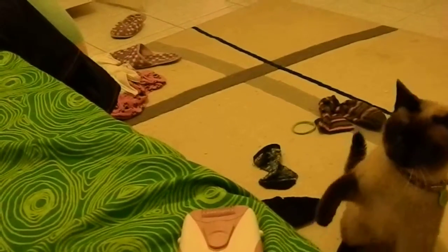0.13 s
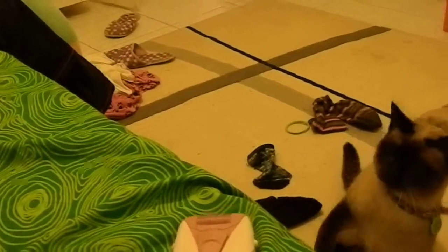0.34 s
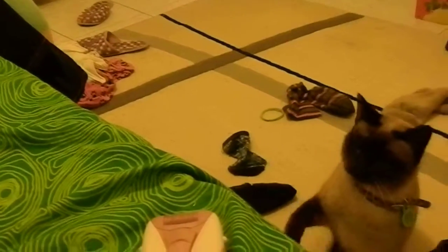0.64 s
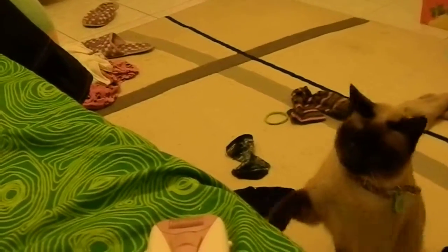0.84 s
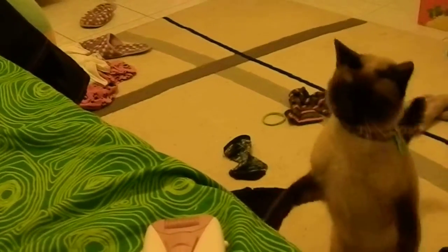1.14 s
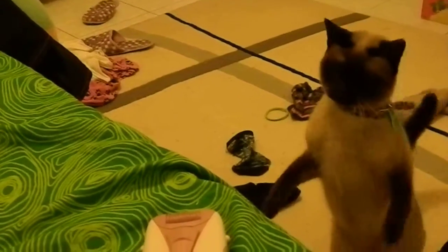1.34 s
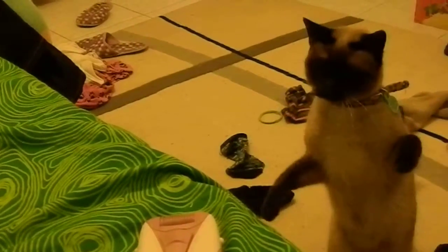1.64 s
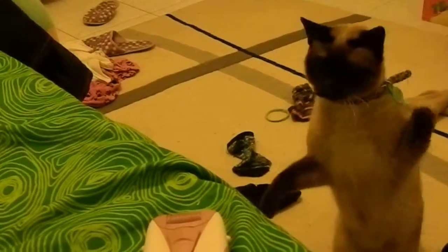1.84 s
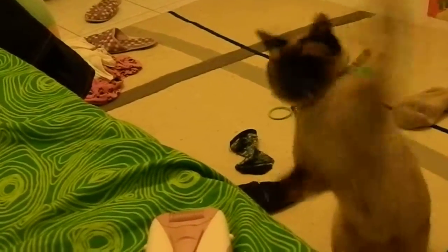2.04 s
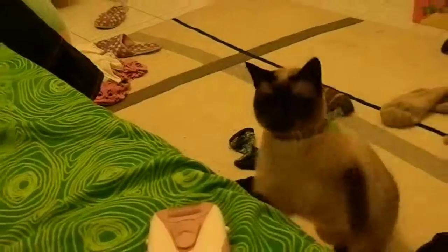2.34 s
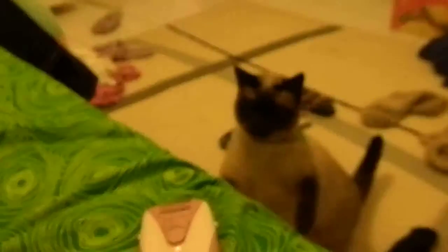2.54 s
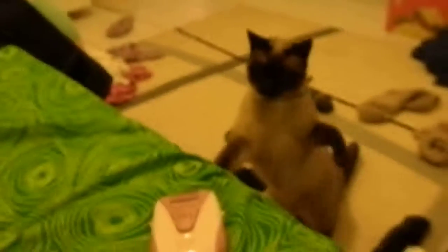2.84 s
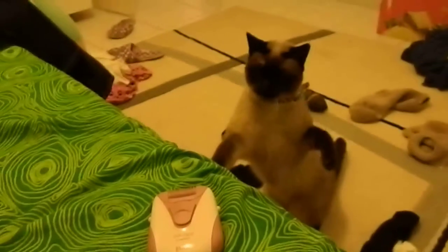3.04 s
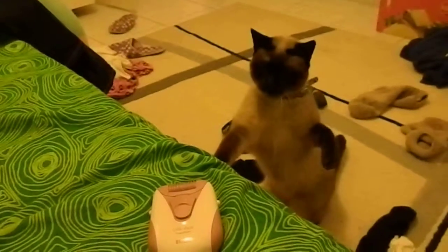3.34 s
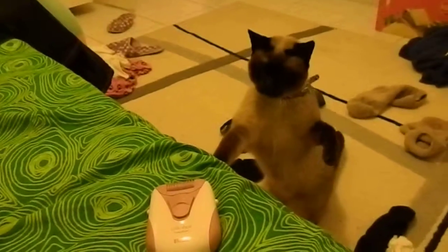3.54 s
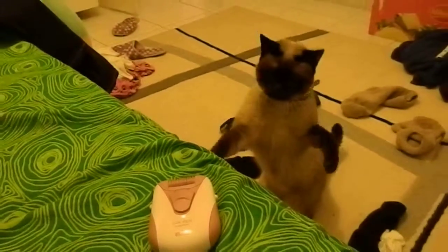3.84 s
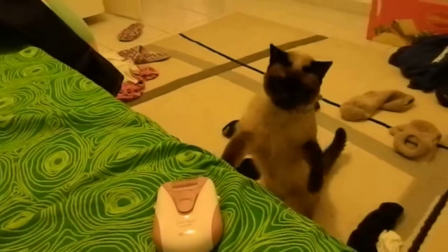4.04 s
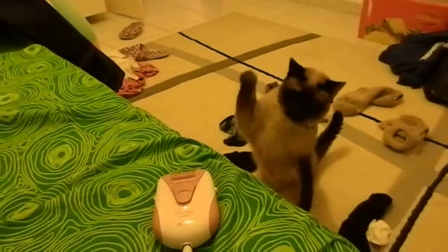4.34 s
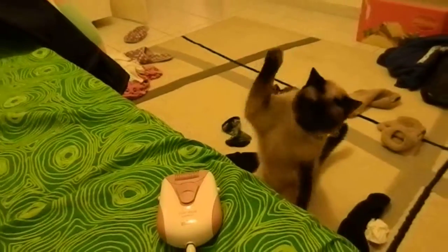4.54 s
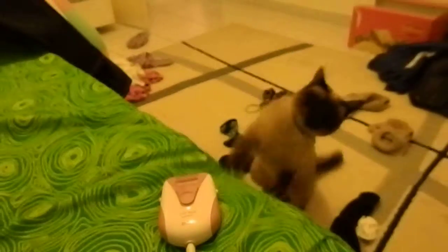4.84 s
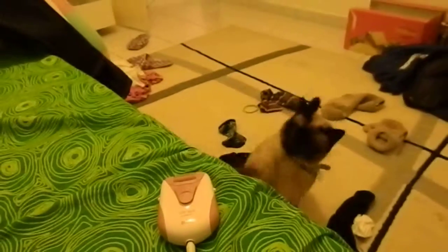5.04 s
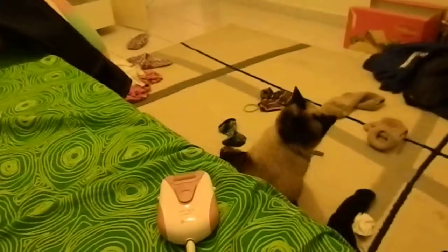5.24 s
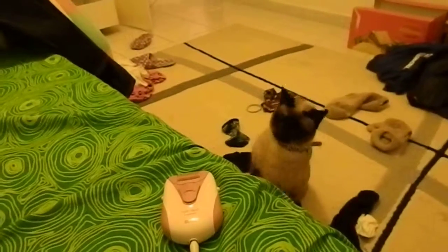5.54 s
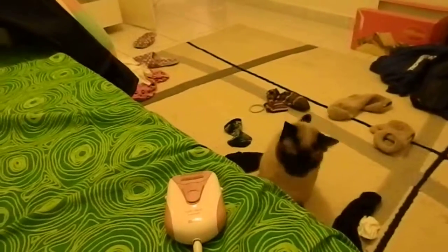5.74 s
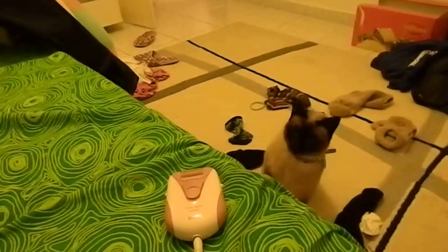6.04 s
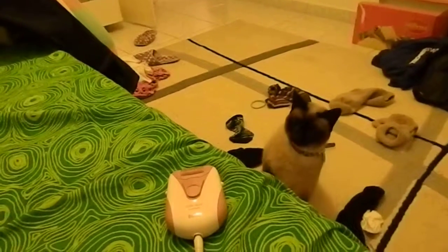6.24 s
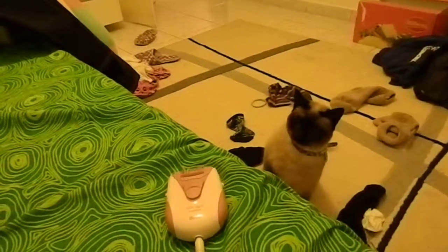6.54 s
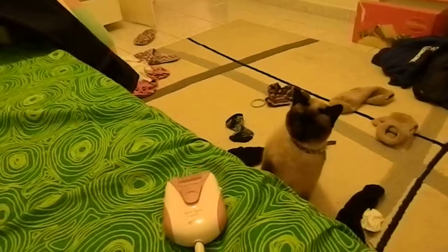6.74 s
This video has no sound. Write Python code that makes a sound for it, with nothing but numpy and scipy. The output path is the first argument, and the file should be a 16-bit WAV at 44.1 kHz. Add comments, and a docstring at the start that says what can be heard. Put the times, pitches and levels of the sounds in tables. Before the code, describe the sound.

A small electric shaver whines and hisses steadily close by in a bedroom while a cat lands twice with dull, tumbling knocks on the floor.

```python
"""The listener first hears a small electric shaver close by in a bedroom: it sings, whines and hisses.
Its gear tones, ringing cutter head and rubbing blades all follow the phase of one shaft.
A cat steps softly and twice comes down in a tumble of knocks: each contact excites damped floor modes.
A short echo follows the knocks, and low-passed noise gives the rumble of the room.
The camera's gain control lowers the level after the loudest knocks and lets it creep back."""
import sys
import numpy as np
from scipy import signal
from scipy.fft import rfft, irfft, next_fast_len
from scipy.io import wavfile
from scipy.ndimage import map_coordinates

SR = 44100
rng = np.random.default_rng(int(sys.argv[2]) if len(sys.argv) > 2 else 0)


def to_wav(sig):
    """Store sig (one row per channel, or 1-D mono) as 16-bit WAV at the path in sys.argv[1].

    Samples outside -1..1 are clipped; the rate is SR.
    """
    pcm = np.clip(np.atleast_2d(sig), -1, 1) * 32767
    pcm = np.round(pcm).astype(np.int16)
    wavfile.write(sys.argv[1], SR, pcm.T)  # frames by channels


N = 303408
T = np.arange(N) / SR

# cutter speed at the start (turns/s) and its creep (turns/s per s)
TURNS_PER_S, CREEP_PER_S = 35.468, 0.008
# strongest low motor tone: order, starting level before its waver, and fade
DRONE_ORDER, DRONE_DB, DRONE_FADE_DB_PER_S = 20, -47.5, 1.15
# gear tones, order 30 being the tooth mesh: [multiple of the cutter turn, relative level/dB]
GEAR_TONES = [(10, -55), (11, -60), (26, -54), (27, -48), (29, -52), (30, -34), (31, -52), (37, -55),
              (38, -55), (39, -55), (40, -52), (49, -52), (50, -49.5), (54, -55), (60, -54), (63, -52),
              (64, -53), (69, -47), (86, -49), (87, -44), (88, -52), (96, -48), (101, -50), (106, -52),
              (112, -51), (114, -51), (134, -53), (136, -51), (152, -52)]
# tones beating into a flutter, most near the ring of the head: [multiple of the cutter turn, relative level/dB]
WHINE_TONES = [(71, -49), (71.35, -53), (73.62, -35), (75, -47), (76, -31), (78, -45), (78.23, -34),
               (79, -42), (80, -46), (80.61, -43), (82, -50), (147.25, -46)]
# course of the ringing cutter head, with a brief extra dip near 4.9 s: [t/s, relative level/dB]
RING_LEVEL = [(0.15, -30), (0.65, -30.5), (0.77, -27.5), (3.38, -27), (4.8, -27), (4.89, -29.5),
              (5.09, -28.5), (6.75, -28)]
# spectrum of blades rubbing in the head: [f/Hz, relative spectral level/dB]
RUB_SPECTRUM = [(270, -37), (370, -10.5), (600, -16), (800, -10), (1050, -3.5), (1700, -9), (2400, -2.5),
                (3300, -4), (3900, -1), (4500, -3), (5200, 2.5), (5800, -5.5), (7200, -6.5), (10000, -6),
                (15000, -10.5)]
# left-right likeness of the rubbing: [f/Hz, coherence]
RUB_COHERENCE = [(300, 0.24), (1200, 0.57), (2800, 0.74), (4200, 0.54), (6400, 0.69), (10000, 0.54),
                 (15000, 0.25)]


def shaver():
    """Rotating-machine orders: one shaft phase sets every tone and modulates the friction noise."""
    speed = (TURNS_PER_S + CREEP_PER_S * T) * (1 + 0.000292 * wobble(5))
    turns = np.cumsum(speed) / SR
    tonal = gears(turns) + drone(turns) + ringing_head(turns)
    return ports(tonal + rubbing(turns) + surface_buzz(turns), lag_ms=0.018)


def gears(turns):
    """Gear meshing: teeth meeting at fixed ratios radiate multiples of the cutter speed."""
    return amp(-0.14) * tones(GEAR_TONES, turns, waver_db=0.48, slack=0.12)


def drone(turns):
    """A single shaft order whose amplitude decays exponentially with a random waver."""
    level_db = DRONE_DB - DRONE_FADE_DB_PER_S * T + 1.9 * wobble(2.98)
    return np.sqrt(2) * amp(level_db) * np.sin(2 * np.pi * DRONE_ORDER * turns)


def ringing_head(turns):
    """Beating and resonance: close tones flutter, and rubbing noise excites the head's own resonance."""
    whine = amp(0.4) * tones(WHINE_TONES, turns, waver_db=0.36, slack=0.13)

    def head_response(f):
        return resonance(f, hz=2770, width_hz=470) ** 2
    head = amp(-34.5) * noise(head_response, [(2750, 0.36)])
    return amp(curve(RING_LEVEL) + 0.73) * unit(whine + head)


def rubbing(turns):
    """Amplitude-modulated friction noise: blade pressure varies within each turn."""
    bites = 0.4 * np.cos(2 * np.pi * 6 * turns)  # six bites a turn
    uneven_side = 0.22 * np.cos(2 * np.pi * turns)  # a little harder on one side
    pressure = amp(bites + uneven_side + 0.59 * wobble(10))
    hiss = noise(lambda f: amp(along(RUB_SPECTRUM, f)), RUB_COHERENCE)
    return amp(-27.0) * pressure * scatter(hiss, share=0.42, drift_rate=1.53)


def surface_buzz(turns):
    """Periodic roughness: a surface repeating each turn yields a dense comb of weak harmonics."""
    def colour(f):
        return amp(along(RUB_SPECTRUM, f)) / (1 + (f / 6000) ** 2)
    return amp(-36.5) * unit(filtered(one_turn(turns), colour))


def tones(lines, turns, waver_db, slack):
    """Order-locked partials: play in the drive modulates each level and phase (slack in radians)."""
    out = np.zeros(N)
    for order, db in lines:
        phase = 2 * np.pi * (order * turns + rng.random()) + slack * wobble(14)
        out += np.sqrt(2) * amp(db + waver_db * wobble(9)) * np.sin(phase)
    return out


def one_turn(turns, size=1024):
    """Angular periodicity: one random surface is read again on every turn."""
    surface = rng.standard_normal(size)
    return map_coordinates(surface, [turns % 1 * size], mode="grid-wrap")


def scatter(x, share, drift_rate, count=12):
    """Multipath scattering: nearby bedding adds weak, dull copies whose levels drift as the hand moves."""
    delays_s = rng.uniform(.0005, .009, count)
    copies = sum(wobble(drift_rate) * np.roll(x, round(delay * SR), axis=-1) for delay in delays_s)
    dull = filtered(copies, lambda f: 1 / np.hypot(1, f / 6000))
    return unit(x + share * dull / np.sqrt(count))


# where the shaver lies between the microphones: [f/Hz, left minus right level/dB]
SHAVER_BALANCE = [(300, 5), (1100, 4), (2700, 2.5), (4200, 2), (6400, -1), (9800, -3.5), (15000, -0.5)]


def ports(x, lag_ms):
    """Interchannel time and level differences: left is slightly later, and louder below the treble."""
    half = np.array([[.5], [-.5]])
    lag_s = lag_ms / 1000

    def response(f):
        return amp(half * along(SHAVER_BALANCE, f)) * np.exp(-2j * np.pi * f * half * lag_s)
    return filtered(x, response)


# floor and bed frame: [f/Hz, relative level/dB, t60/s before the cat's damping]
FLOOR_MODES = [(72, -12.5, 0.11), (97, -5, 0.15), (131, -17.5, .08), (176, -7.5, 0.046), (192, -4.5, 0.069),
               (269, -15, 0.045), (350, -12, 0.064), (387, -5, 0.048), (504, -11.5, 0.046),
               (609, -11.5, 0.049)]
# the cat's weight shortens the ringing to this share
DAMPED_SHARE = 0.81
# a quick push stirs the lowest modes less, a slow one the highest: cycles within the rise
PUSH_CYCLES, SMOOTH_CYCLES = 0.19, 1


def paws():
    """Modal excitation: each contact rings the floor modes; softer, slower ones favour the low modes."""
    thuds, taps = np.zeros(N + SR), np.zeros(N + SR)
    t = np.arange(SR // 2) / SR
    for s, thud_db, tap_db, rise_s in contacts():
        start = round(s * SR)
        thuds[start:start + len(t)] += amp(thud_db + 4.5) * floor_ring(t, thud_db, rise_s)
        burst = amp(-60 * t / 0.012) * rng.standard_normal(len(t))  # 12 ms t60
        taps[start:start + len(t)] += amp(tap_db + 11.5) * burst
    # the floor radiates almost nothing below its first mode
    low_cut = signal.butter(4, 55, "highpass", fs=SR, output="sos")

    def tap_colour(f):
        # padded paws leave the taps without treble
        return resonance(f, hz=1450, width_hz=2200) / (1 + (f / 4300) ** 4)
    return signal.sosfilt(low_cut, thuds[:N]) + filtered(taps[:N], tap_colour)


def floor_ring(t, thud_db, rise_s):
    """Modal superposition: decaying sines, weighted by the spectrum of the push."""
    hz, level_db, t60 = np.transpose(FLOOR_MODES)[:, :, None]
    soft_hz = min(1000 * amp(1.25 * (thud_db + 19.5)), SMOOTH_CYCLES / rise_s)
    strength = amp(level_db + 1.7 * rng.standard_normal(hz.shape))
    strength = strength / np.sqrt(1 + (hz / soft_hz) ** 4)
    strength = strength / np.hypot(1, PUSH_CYCLES / (rise_s * hz))
    decay = amp(-60 * t / (DAMPED_SHARE * t60))
    modes = strength * decay * np.sin(2 * np.pi * (hz * t + rng.random(hz.shape)))
    return modes.sum(0) * (1 - np.exp(-t / rise_s))


# soft steps: [t/s, relative thud level/dB]
SOFT_STEPS = [(.755, -34), (2.221, -31), (2.494, -27), (4.915, -31), (5.03, -36), (5.07, -35.5)]
# the cat comes down: [main blow t/s, thud level/dB, forepaws' lead/s, last paw level/dB, settling level/dB]
# (levels are relative)
CAT_LANDINGS = [(2.110, -12.5, .020, -16.5, -19.5), (4.864, -11.5, .036, -21, -25)]
# rise constants of a thud: in a landing, in a soft step
LANDING_RISE_S, STEP_RISE_S = 0.0012, .005
# a step rolls from pad to toes; a padded contact's tap relative to its thud or settling level
ROLL_S, PAD_TAP_DB = 0.0193, -25


def contacts():
    """Contact sequence: landings rise fast, steps slowly: (s, thud dB, tap dB, rise s)."""
    hard = [(*touch, LANDING_RISE_S) for row in CAT_LANDINGS for touch in landing(*row)]
    soft = []
    for s, db in SOFT_STEPS:
        for delay in (0, ROLL_S):
            soft.append((s + delay, db, db + PAD_TAP_DB, STEP_RISE_S))
    return hard + soft


# the forepaws touch first, softly; the second one has this share of the lead left
FOREPAW_DB, FOREPAW_TAP_DB, SECOND_PAW_SHARE = -17, -33, .42
# the hind paws slap down just apart: delay of the last one, tap of the main blow
LAST_PAW_S, SLAP_DB = .0115, -14.5
# the body settles in ever weaker bumps: spacing, loss per bump
SETTLE_S, SETTLE_LOSS_DB = .029, 3


def landing(s, db, lead_s, last_db, settle_db, count=2):
    """Successive impacts: forepaws, hind paws, then settling bumps, as (s, thud dB, tap dB)."""
    fore = [(s - lead_s * share, FOREPAW_DB, FOREPAW_TAP_DB) for share in (1, SECOND_PAW_SHARE)]
    hind = [(s, db, SLAP_DB), (s + LAST_PAW_S, last_db, last_db)]
    bumps = []
    for k in range(count):
        bumps.append((s + (k + 1) * SETTLE_S, settle_db - k * SETTLE_LOSS_DB, settle_db + PAD_TAP_DB))
    return fore + hind + bumps


# reverberation of the room: [f/Hz, t60/s]
ROOM_DECAY = [(100, 0.51), (400, 0.31), (2000, 0.38), (10000, 0.075)]


def room(x):
    """Diffuse reverberation: two noise tails decay exponentially, the highest notes fastest."""
    hz, t, z = signal.stft(rng.standard_normal((2, SR // 2)), SR, nperseg=256)
    decay = amp(-60 * t / along(ROOM_DECAY, hz)[:, None])
    tail = signal.istft(z * decay, SR, nperseg=256)[1]
    return signal.fftconvolve(x[None], tail / np.linalg.norm(tail[0]), axes=1)[:, :N]


# spectrum of the room rumble: [f/Hz, relative spectral level/dB]
RUMBLE_SPECTRUM = [(20, -28), (45, -31), (62, -8), (95, 1.5), (140, -3), (195, -1), (250, -11.5),
                   (450, -13), (900, -44), (3000, -60)]


def room_rumble():
    """Shaped background noise: steady low-frequency noise, largely alike in both channels."""
    return amp(-50.5) * noise(lambda f: amp(along(RUMBLE_SPECTRUM, f)), [(100, 0.8)])


def amp(db):
    """Logarithmic level: decibels to amplitude gain."""
    return 10 ** (np.asarray(db) / 20)


def unit(x):
    """Power normalisation: x at rms 1."""
    return x / np.sqrt(np.mean(x ** 2) + 1e-20)


def along(points, hz):
    """Logarithmic frequency scale: (Hz, value) points interpolated on a log axis."""
    f, v = np.transpose(points)
    return np.interp(np.log(hz + 1), np.log(f), v)


def curve(rows):
    """Linear envelope: (s, value) points read at every sample."""
    return np.interp(T, *np.transpose(rows))


def wobble(rate):
    """Band-limited random modulation: a smooth curve with rate knots a second."""
    coarse = T[::64]
    knots = rng.standard_normal(int(T[-1] * rate) + 4)
    return np.interp(T, coarse, map_coordinates(knots, [coarse * rate], mode="nearest"))


def filtered(x, response):
    """Linear filtering: the spectrum of x times a response of frequency."""
    m = next_fast_len(N + SR // 2)
    return irfft(rfft(x, m) * response(np.fft.rfftfreq(m, 1 / SR)), m)[..., :N]


def resonance(f, hz, width_hz):
    """Damped oscillator: one causal resonance with a peak gain of 1."""
    return 1j * f * width_hz / (hz ** 2 - f ** 2 + 1j * f * width_hz)


def noise(colour, coherence):
    """Interchannel coherence: the mid-side mix sets the likeness of coloured stereo noise of rms 1."""
    def response(f):
        turn = np.arccos(np.clip(along(coherence, f), -1, 1)) / 2
        return colour(f) * np.array([np.cos(turn), np.sin(turn)])
    mid, side = filtered(rng.standard_normal((2, N)), response)
    return unit(np.array([mid + side, mid - side]))


def scene():
    """Superposition: shaver, cat with its echo, and rumble add linearly."""
    knocks = paws()
    half = np.array([[.5], [-.5]])
    # the close-set microphones hear nearly the same low echo
    shared, apart = room(knocks)
    echo = amp(-13.0) * shared + amp(-17) * half * apart
    cat = (knocks + echo) * amp(4.1 * half)  # left 4.1 dB above right
    return shaver() + cat + room_rumble() * amp(0.63 * half)


def gain_control(x, limit_db, recover_db_per_s):
    """Peak-hold limiting: gain drops by the excess over the limit, then recovers linearly in dB."""
    power = signal.lfilter([1 / 440], [1, 1 / 440 - 1], np.mean(x ** 2, 0))  # about 10 ms average
    over_db = np.maximum(10 * np.log10(power + 1e-12) - limit_db, 0)
    ramp_db = recover_db_per_s * T
    return x * amp(ramp_db - np.maximum.accumulate(over_db + ramp_db))


TOP_HZ = 15750


def record(dry):
    """Dynamic compression and band limiting: the camera's gain control, then a sharp treble cutoff."""
    levelled = gain_control(dry, limit_db=-18.0, recover_db_per_s=8.5)
    return filtered(levelled, lambda f: f < TOP_HZ)


dry = scene()
out = record(dry)
to_wav(out)
```